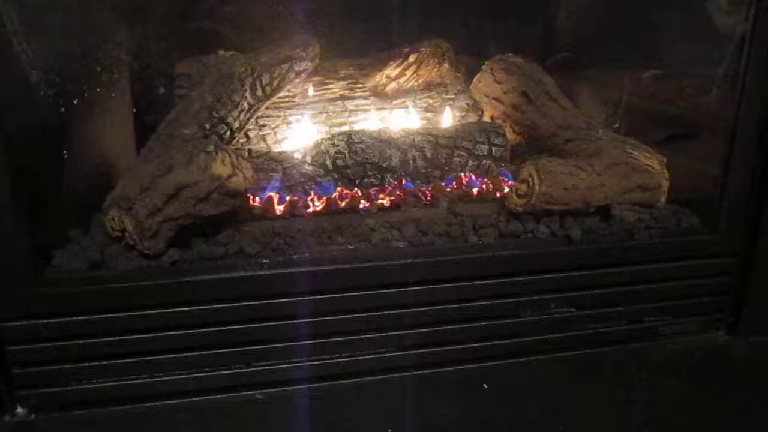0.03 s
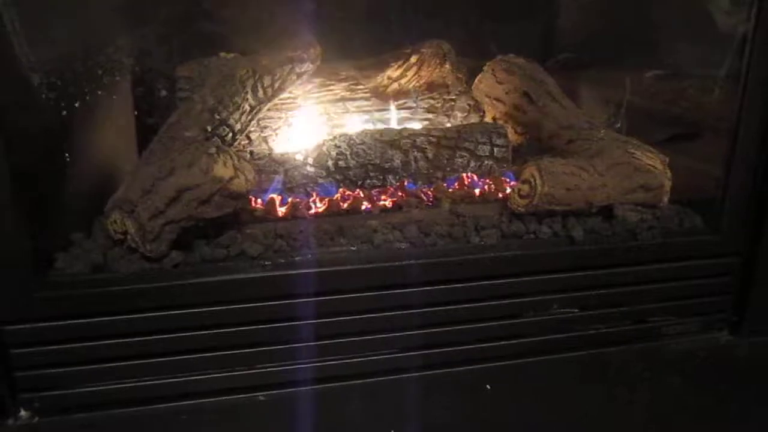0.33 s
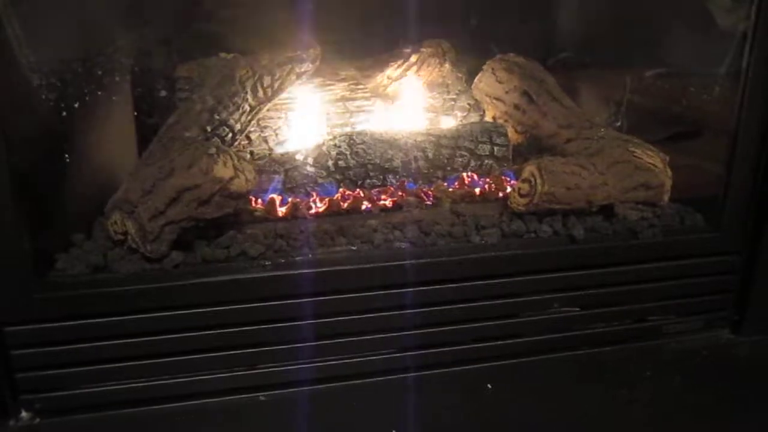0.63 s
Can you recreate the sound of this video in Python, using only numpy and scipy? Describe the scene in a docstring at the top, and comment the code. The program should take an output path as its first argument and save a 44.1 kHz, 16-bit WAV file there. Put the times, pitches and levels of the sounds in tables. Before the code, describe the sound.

A gas fireplace blower hums low with a fast, buzzing metal rattle.

```python
"""A low, throbbing hum with a fast, buzzing rattle: a gas fireplace blower, indoors, close by.
The induction motor hums at twice the mains rate; rotor slip beats against that hum.
At the top of each beat the housing knocks on its sheet-metal surround and a loose part chatters.
Air and flame rush softly underneath. Near the end the rotor speeds up, so the beats slow into
separate bursts and the rattle lets go."""
import sys
import numpy as np
from scipy import signal
from scipy.fft import rfft, irfft
from scipy.io import wavfile

SR = 44100
rng = np.random.default_rng(int(sys.argv[2]) if len(sys.argv) > 2 else 0)


def unload_audio(sound):
    """Save the sound as a 16-bit wav file, at the path given as the first command line argument."""
    columns = np.transpose(np.atleast_2d(sound))
    # keep every value between -1 and 1, then stretch to whole-number steps
    steps = np.round(np.clip(columns, -1, 1) * 32767)
    wavfile.write(sys.argv[1], SR, steps.astype(np.int16))


N = 176400
T = np.arange(N) / SR
BUZZ_HZ = 119.947  # twice mains

# rotor speed (time [s], speed [rev/s])
ROTOR_RPS = [(0, 37.97), (0.4, 37.26), (0.8, 37.78), (1.25, 37.51), (1.6, 35.9), (1.9, 37.13),
             (2.15, 36.72), (2.45, 36.62), (2.75, 35.75), (3.05, 37.24), (3.35, 37.16), (3.5, 42.35),
             (3.65, 49.84), (3.8, 55.46), (4, 58.1)]
# overall gain, on top of all levels below (time [s], gain [dB])
MASTER_DB = [(.07, -4.5), (.5, -3.5), (1.25, 0), (2.1, -0.27), (3.3, -1), (4, -4)]

# steady hum partials (buzz multiple)
STEADY_ORDERS = [1, 1.5, 2, 2.5, 3, 5, 6, 8, 12]
# per steady partial (level [dB])
STEADY_DB = [-45.5, -56.5, -27.5, -66.5, -52.5, -44.5, -42, -48.5, -51.5]
# weak slip sidebands (buzz multiple, beat multiple added)
SIDEBAND_ORDERS = [(1, 1), (1, 2), (3, -3), (3, -2), (2, 1), (2, 2), (5, -1), (7, -1), (9, -1), (9, 1),
                   (10, -1), (12, -1), (14, -1)]
# per weak sideband (level [dB])
SIDEBAND_DB = [-44.5, -55.5, -57.5, -53.5, -42.5, -54, -45.5, -48.5, -59, -44.5, -44.5, -46.5, -47.5]
# sideband under harmonic 2 (time [s], level [dB])
THROB_2_DB = [(.07, -32), (1.2, -32.5), (1.8, -29.5), (3.25, -29), (3.55, -33.5), (4, -72)]
# sideband under harmonic 3 (time [s], level [dB])
THROB_3_DB = [(.07, -37.5), (1.2, -38.5), (2, -36.5), (3.3, -36), (3.53, -42), (3.68, -34), (3.88, -34.5),
              (4, -44)]

# housing knocks (buzz phase [cycles], beat phase [beats], width [beats], strength [dB])
KNOCK_HITS = [(.915, .72, .2, 0), (.521, .88, .17, -2), (.28, .2, .15, -8), (.66, .2, .15, -9),
              (.51, .35, .1, -9)]
# knock force (time [s], relative level [dB])
KNOCK_FORCE_DB = [(.07, 1.5), (1.2, 2), (2, 3), (3.3, 2), (3.6, -3.5), (4, -1)]
# loose-part bounces (buzz phase [cycles], beat phase [beats], width [beats], strength [dB])
BOUNCE_HITS = [(.915, .72, .14, 0), (.2, .85, .15, -2.5), (.36, .88, .12, -6), (.56, .95, .12, -4),
               (.84, .12, .12, -4), (.09, .18, .12, -7)]
# bounce force (time [s], relative level [dB])
BOUNCE_FORCE_DB = [(.07, 1), (1.5, 2), (2.4, 2.5), (3.4, 1), (3.78, 4.5), (3.9, 4.5), (4, -18)]
# bounce lag behind the beat (time [s], lag [beats])
BOUNCE_LAG_BEATS = [(.07, .1), (.4, .02), (.9, .1), (1.5, -.15), (2, 0), (2.65, -.17), (3.1, 0), (3.4, .13),
                    (3.65, .06), (3.8, .08), (4, -.03)]

# low sheet-metal modes (frequency [Hz], bandwidth [Hz], gain [dB])
PANEL_MODES = [(569, 56, 5), (806, 12, 4), (939, 40, 3.5), (1150, 20, -2.5), (1222.6, 83, 10.5),
               (1389, 43, 9), (1572, 42, 6.5), (1730, 16, -9.5), (1994, 49, -10), (2140, 38, -13)]
# high sheet-metal modes (frequency [Hz], bandwidth [Hz], gain [dB])
TREBLE_MODES = [(2770, 31, 11), (3146, 55, 7), (3230, 30, 0), (3463, 79, 8), (3610, 37, 0.5),
                (3726, 20, -11.5), (3893, 37, 12), (4078, 32, 6.5), (4290, 35, -10.5), (4850, 58, -4.5),
                (5260, 59, -10.5), (5402, 41, -11)]
# loose-part modes (frequency [Hz], bandwidth [Hz], gain [dB])
SHIMMER_MODES = [(5930, 51, -8), (6460, 150, -2.5), (7570, 49, 4.5), (7930, 32, 6), (8280, 130, 1.5),
                 (10570, 61, 1.5), (11400, 130, 0), (11900, 71, 0), (13300, 110, -1)]
# short impact cracks (frequency [Hz], bandwidth [Hz], gain [dB])
CLACK_MODES, TICK_MODES = [(1127, 163, 0)], [(3665, 400, 0)]
# loose-part click spectrum (frequency [Hz], gain [dB])
CHATTER_SPECTRUM = [(1500, -5.5), (2100, -6), (2400, -17), (3100, -1), (3600, 5), (4100, 11.5),
                    (4500, -14.5), (5200, -13.5), (5700, -13.5), (7300, -13.5), (8200, -16.5), (9600, -15),
                    (10600, -14), (11400, -16.5), (12400, -16), (13300, -19), (15500, -36)]
# air and flame spectrum (frequency [Hz], gain [dB])
AIR_SPECTRUM = [(20, -20), (40, -21), (66, -3.5), (88, -14), (125, -9), (165, 1), (270, -2.5), (450, -7),
                (1100, -3.5), (2400, -16), (4000, -13.5), (6500, -29), (15000, -34.5)]


def motor_hum(beat):
    """Mains harmonics plus sidebands offset by rotor slip."""
    buzz = BUZZ_HZ * T
    steady = sum(tone(k * buzz, db) for k, db in zip(STEADY_ORDERS, STEADY_DB))
    sidebands = sum(tone(k * buzz + j * beat, db) for (k, j), db in zip(SIDEBAND_ORDERS, SIDEBAND_DB))
    throb = tone(2 * buzz - beat, curve(THROB_2_DB)) + tone(3 * buzz - beat, curve(THROB_3_DB))
    return steady + sidebands + throb


def housing_knocks(beat):
    """The swinging housing strikes the surround and rings its low modes."""
    force = impacts(beat, KNOCK_HITS, lean_cycles=.015) * undb(curve(KNOCK_FORCE_DB))
    clack = ring(force, CLACK_MODES, band_hz=(475, 2310), rms_db=-35)
    panel = ring(force, PANEL_MODES, band_hz=(475, 2310), rms_db=-39.5)
    return clack + panel


def rattle(beat, wobble_db=1.5, lean_cycles=-.025):
    """Housing knocks plus a loose part bouncing on the panel, harder once per rotor turn."""
    knocks = housing_knocks(beat)
    late_beat = beat - curve(BOUNCE_LAG_BEATS)
    turns = np.cumsum(curve(ROTOR_RPS)) / SR
    push = undb(curve(BOUNCE_FORCE_DB) + wobble_db * np.cos(2 * np.pi * turns))
    bounces = impacts(late_beat, BOUNCE_HITS, lean_cycles) * push
    tick = ring(bounces, TICK_MODES, band_hz=(2680, 4400), rms_db=-43)
    treble = ring(bounces, TREBLE_MODES, band_hz=(2680, 5600), rms_db=-40)
    jolts = impact_train(late_beat, BOUNCE_HITS[0][0], lean_cycles, beat_phase=.78, width_beats=.18)
    return firebox(knocks + tick + treble) + chatter(jolts * push)


def impacts(beat, hits, lean_cycles):
    """Weighted sum of impact trains, one per row."""
    return sum(undb(db) * impact_train(beat, buzz_phase, lean_cycles, beat_phase, width_beats)
               for buzz_phase, beat_phase, width_beats, db in hits)


def impact_train(beat, buzz_phase, lean_cycles, beat_phase, width_beats, jitter_s=2e-5, scatter_db=1):
    """One impact per buzz cycle; the beat sets its force and pulls it early or late."""
    cycles = np.arange(int(BUZZ_HZ * N / SR) - 1) + buzz_phase
    jitter, scatter = rng.standard_normal((len(cycles), 2)).T
    offset_beats = np.interp(cycles / BUZZ_HZ, T, beat) - beat_phase
    onset_s = (cycles + lean_cycles * np.sin(2 * np.pi * offset_beats)) / BUZZ_HZ + jitter_s * jitter
    gap = (np.sin(np.pi * offset_beats) / (np.pi * width_beats)) ** 2
    contact = np.exp(-.5 * gap ** 2)  # 1 pressed together, 0 free
    samples = np.clip(onset_s * SR, 0, N - 1).astype(int)
    return np.bincount(samples, contact * undb(scatter_db * scatter), N)


def chatter(jolts, rise_s=.002, floor=.2, grain_db=.5):
    """Each jolt shakes the loose part into tiny ringing clicks, partly the same every time."""
    age = T[:SR // 20] / rise_s
    burst = age * np.exp(-age)
    envelope = level(signal.fftconvolve(jolts, burst)[:N], 0) + floor
    noise = rng.standard_normal(N)
    flicker = undb(-grain_db * np.repeat(rng.standard_normal(N // 32 + 1), 32)[:N])
    repeated = signal.fftconvolve(jolts, burst * rng.standard_normal(len(age)))[:N]
    clicks = level(noise * flicker * envelope, 0) + level(repeated, 0)
    shimmer = ring(clicks, SHIMMER_MODES, band_hz=(5300, 14700), rms_db=-54.5)
    return level(colour(clicks, CHATTER_SPECTRUM), -43) + shimmer


def firebox(x, t60_s=.12, wet_db=-10):
    """Direct sound plus dense, decaying box and room reflections."""
    t = T[:SR // 2]
    tail = rng.standard_normal(len(t)) * np.exp(-np.log(1000) * t / t60_s)
    tail *= undb(wet_db) / np.sqrt(np.sum(tail ** 2))
    return x + signal.fftconvolve(x, tail)[:N]


def air_rush():
    """Soft noise of blown air and burning gas."""
    return level(colour(rng.standard_normal(N), AIR_SPECTRUM), -32.5)


def ring(x, modes, band_hz, rms_db):
    """Damped resonances radiating within a band."""
    ringing = sum(undb(db) * signal.lfilter(*signal.iirpeak(hz, hz / width_hz, fs=SR), x)
                  for hz, width_hz, db in modes)
    bandpass = signal.butter(3, band_hz, "bandpass", fs=SR, output="sos")
    return level(signal.sosfilt(bandpass, ringing), rms_db)


def colour(x, spectrum):
    """Spectral shaping, interpolated over log frequency."""
    hz, db = np.array(spectrum).T
    bins_hz = np.maximum(np.fft.rfftfreq(N, 1 / SR), 1)
    return irfft(rfft(x) * undb(np.interp(np.log(bins_hz), np.log(hz), db)), N)


def tone(cycles, rms_db):
    return np.sqrt(2) * undb(rms_db) * np.cos(2 * np.pi * cycles)


def curve(rows):
    return np.interp(T, *np.array(rows).T)


def level(x, rms_db):
    return x * undb(rms_db) / np.sqrt(np.mean(x ** 2))


def undb(db):
    return 10 ** (np.asarray(db) / 20)


def scene(start_s=.072, beat_zero_s=.0027):
    """Hum, rattle and air, mono; beat rate is twice the slip between mains field and rotor."""
    beat = np.cumsum(BUZZ_HZ - 2 * curve(ROTOR_RPS)) / SR
    beat -= np.interp(beat_zero_s, T, beat)
    blower = motor_hum(beat) + rattle(beat) + air_rush()
    return (blower * undb(curve(MASTER_DB)) * (T > start_s))[None]


def record(dry):
    """Steep low-pass at 15750 Hz."""
    return signal.sosfilt(signal.ellip(10, .1, 80, 15750, fs=SR, output="sos"), dry)


dry = scene()
out = record(dry)
unload_audio(out)
```